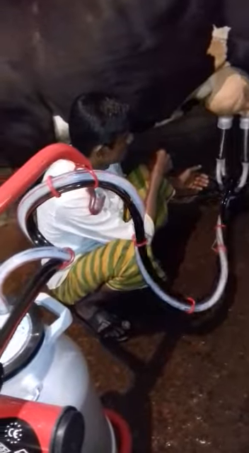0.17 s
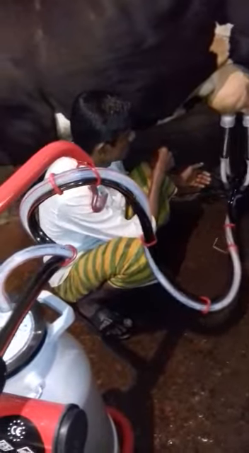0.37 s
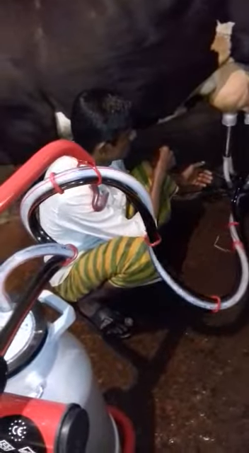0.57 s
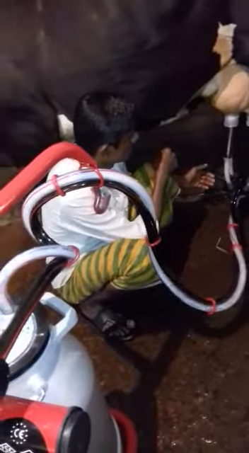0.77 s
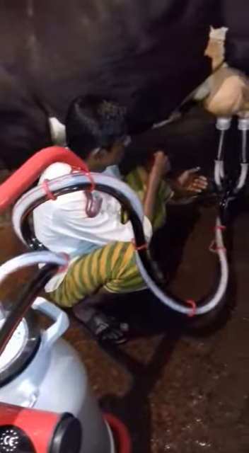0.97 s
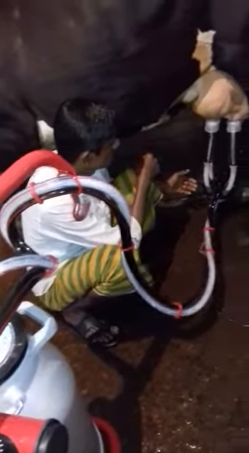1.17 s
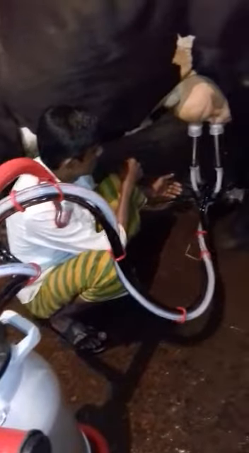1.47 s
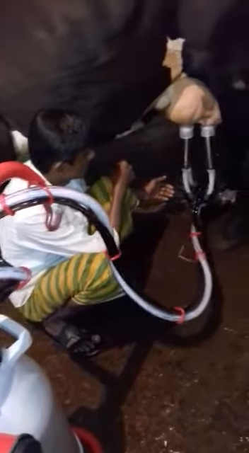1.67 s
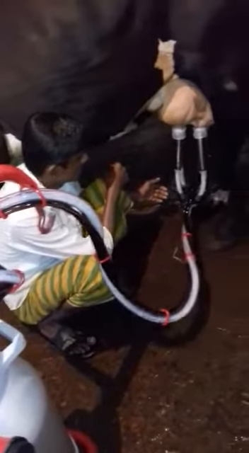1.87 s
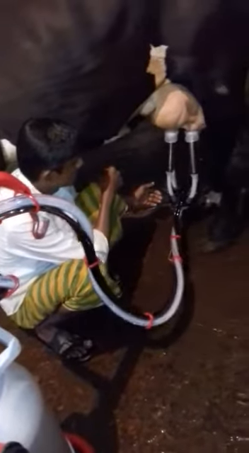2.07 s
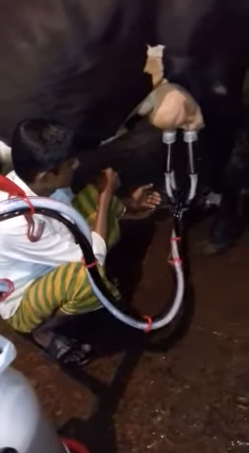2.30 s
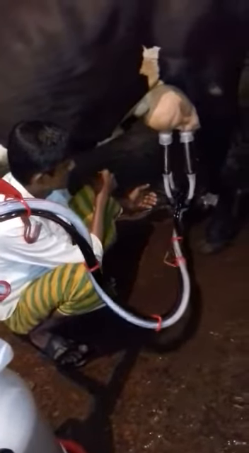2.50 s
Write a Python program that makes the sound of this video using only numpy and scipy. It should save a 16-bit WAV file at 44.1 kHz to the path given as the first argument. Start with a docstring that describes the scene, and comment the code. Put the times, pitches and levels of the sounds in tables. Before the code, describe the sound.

A portable milking machine runs steadily up close, its vacuum pump hissing and chugging rapidly.

```python
"""A portable milking machine runs steadily beside a cow, close to the microphone.
Its motor-driven vacuum pump chugs twice a turn: even harmonics of the shaft rate, with casing and frame tones.
Coloured noise makes the rough churning and the loud air hiss, which dips and puffs at each chug.
A knock once a turn rings small metal parts; the pulsator clacks over and back about once a second.
Something shuffles softly near the middle, as a short swell of dull noise."""
import sys
import numpy as np
from scipy import signal
from scipy.fft import rfft, irfft
from scipy.io import wavfile

SR = 44100
rng = np.random.default_rng(int(sys.argv[2]) if len(sys.argv) > 2 else 0)


def to_wav(sig):
    """Store sig (one row per channel, or 1-D mono) as 16-bit WAV at the path in sys.argv[1].

    Samples outside -1..1 are clipped; the rate is SR.
    """
    pcm = np.clip(np.atleast_2d(sig), -1, 1) * 32767
    pcm = np.round(pcm).astype(np.int16)
    wavfile.write(sys.argv[1], SR, pcm.T)  # frames by channels


N = 116424  # samples

SHAFT_HZ, SPEED_WANDER = 48.255, 0.00048  # mean shaft rate; spread as a share of it

# Pump hum, before the body level: multiple_of_shaft_rate, level_db
HUM_HARMONICS = [(2, -56.5), (4, -44), (6, -53), (8, -41), (10, -40.5), (12, -43.5), (14, -52)]
CHUG_TURN, HUM_WAVER_DB = 0.2767, 0.68  # place of the crest in turns; level spread
CHUG_SMEAR = 0.0035  # turns of delay per multiple: each chug sweeps upward

# Casing shaken once a turn, before the body level: multiple_of_shaft_rate, level_db
CASING_HARMONICS = [(20, -52), (21, -54.5), (22, -51.5), (23, -63), (24, -44), (25, -45), (26, -47.5),
                    (27, -57.5), (32, -50.5), (34, -58), (44, -47)]
CASING_WAVER_DB = 1.1
# Steady tones of motor and frame, before the body level: pitch_hz, level_db
FRAME_TONES = [(85, -63), (204, -54), (264, -58), (748, -62)]

# Colour of the running machine's churning: freq_hz, relative_db_per_hz
CHURN_COLOUR = [(25, -33), (60, -29), (130, -22), (260, -13.5), (550, -11), (720, -10), (930, -6),
                (1270, -3), (1400, -11), (1580, -6.5), (1950, -6), (2650, 2), (3020, -4), (3400, 1.5),
                (3900, -5), (6000, -15)]
CHURN_DB, CHURN_FLUTTER_DB = -27, 0.5  # level before the body level; level spread

# Level of hum, casing, frame and churn as the microphone moves: time_s, gain_db
BODY_LEVEL_CURVE = [(0, -0.4), (.9, -0.5), (1.65, 0), (2.2, -0.3), (2.64, -1.2)]

# Colour of the rushing air: freq_hz, relative_db_per_hz
HISS_COLOUR = [(200, -49), (2000, -30), (4000, -16), (4700, -8), (5700, -11), (6000, -6.5), (6350, -6.5),
               (6900, -1.5), (7750, 0.9), (8350, 2.5), (9050, -0.9), (9600, -4.5), (10000, -5),
               (11200, -10), (11600, -8.3), (13200, -14), (15600, -13)]
# Faint whistles of the air outlet: pitch_hz, width_hz, boost_db
OUTLET_WHISTLES = [(6930, 160, 3.5), (7870, 100, 3.5), (8700, 190, 2), (10500, 150, 6), (11600, 140, 1.5)]
# Level of the hiss over time, added to HISS_DB: time_s, gain_db
HISS_LEVEL_CURVE = [(0, -.2), (.7, -0.55), (1.4, -0.5), (2.2, 0), (2.64, 0.2)]
HISS_DB = -13
HISS_FLUTTER_DB, FLUTTER_HZ, HISS_GRAIN_DB = 0.43, 26, 0.58  # slow flutter and its rate; fast grain
VALVE_TURN, VALVE_DIP, VALVE_PUFF = 0.277, 0.31, 0.16  # place in turns; shares of the flow
VALVE_WIDTH, PUFF_LAG = 0.091, 0.13  # chugs

# What the knock rings: pitch_hz, t60_s, relative_level_db
KNOCK_MODES_TABLE = [(2730, .006, -6), (3317, 0.033, -2), (3476, 0.021, -3), (3440, .008, -32),
                     (4600, .005, 3)]
KNOCK_TURN, TURN_JITTER_S = .47, .00002  # place in turns; timing scatter
KNOCK_DB, KNOCK_SPREAD = -32, 0.33  # level of the whole train; scatter of each blow's strength
KNOCK_GRIT, KNOCK_GRIT_S = 0.091, 0.00087  # noise share of a blow; its decay time
KNOCK_LOW_HZ = 2300  # the small parts radiate little below this

# Pulsator clacks: start_s, level_db
PULSATOR_CLACKS = [(.491, -17.5), (1.035, -15), (1.551, -15.5), (2.098, -14.5), (2.613, -17)]
# Colour of the clacks: freq_hz, relative_db_per_hz
CLACK_COLOUR_CURVE = [(400, -35), (1100, -15), (2100, -17), (2600, 2.5), (3400, -9.5), (4400, 2.5),
                      (5400, -24), (10000, -37)]
CLACK_DECAY_S, REBOUND_S, REBOUND_DB = .003, .0055, -2  # rebound: delay and relative level

# Colour of the soft shuffle: freq_hz, relative_db_per_hz
SHUFFLE_COLOUR = [(120, -28), (220, -4), (310, 6), (400, 2.5), (600, -13), (1500, -38)]
SHUFFLE_S, SHUFFLE_WIDTH_S, SHUFFLE_DB = 1.16, 0.052, -37.5  # centre, swell width, peak level

CEILING, TOP_HZ = .88, 15720  # full-scale limit; upper edge of the sound
NOTCH_HZ, NOTCH_WIDTH_HZ, NOTCH_DEPTH, NOTCH_REACH_HZ = 8060, 1100, .62, 1900  # depth: share removed


def undb(db):
    """Decibels to gain."""
    return 10 ** (np.asarray(db) / 20)


def unit(x):
    """Scale to rms 1."""
    return x / np.sqrt(np.mean(x ** 2))


def bin_hz():
    """Frequency of each spectrum bin."""
    return np.arange(N // 2 + 1) * SR / N


def curve(points, t):
    """Gain drawn in straight dB lines between (time_s, gain_db) points."""
    return undb(np.interp(t, *np.array(points).T))


def colour(x, points):
    """Filter by (freq_hz, db) points, joined over log frequency."""
    hz, db = np.array(points, float).T
    f = np.maximum(bin_hz(), 1)
    gain = undb(np.interp(np.log(f), np.log(hz), db))
    return irfft(rfft(x) * gain, N)


def noise(points):
    """Noise of a given colour, rms 1."""
    return unit(colour(rng.standard_normal(N), points))


def walk(rate):
    """Random wavering with spread 1, mostly slower than rate in Hz."""
    f = bin_hz()
    lowpass = np.exp(-2 * (f / rate) ** 2) * (f > 0)
    return unit(irfft(rfft(rng.standard_normal(N)) * lowpass, N))


def tone(cycles, db):
    """A sine at an rms level."""
    return np.sqrt(2) * undb(db) * np.cos(2 * np.pi * cycles)


def pump_hum(turns):
    """Two chugs a turn: even harmonics that crest nearly together, the higher ones a little later."""
    hum = np.zeros(N)
    for multiple, db in HUM_HARMONICS:
        k = round(multiple)
        hum += tone(k * (turns - CHUG_TURN - CHUG_SMEAR * k), db + HUM_WAVER_DB * walk(5.9))
    return hum


def casing_and_frame(turns, t):
    """The casing buzzes at multiples of the shaft rate; motor and frame hold fixed pitches."""
    buzz = np.zeros(N)
    for multiple, db in CASING_HARMONICS:
        buzz += tone(round(multiple) * turns + rng.random(), db + CASING_WAVER_DB * walk(39))
    for hz, db in FRAME_TONES:
        buzz += tone(hz * t + rng.random(), db + walk(10))
    return buzz


def churn():
    """Rough running of motor and pump: coloured noise with a fluttering level."""
    return noise(CHURN_COLOUR) * undb(CHURN_DB + CHURN_FLUTTER_DB * walk(46))


def air_hiss(turns, t):
    """Turbulent hiss with faint whistles; it is pinched off a little, then puffs, at each chug."""
    chugs = 2 * (turns - VALVE_TURN)

    def bump(lag):
        """A smooth pulse once a chug."""
        offset = (chugs - lag + .5) % 1 - .5
        return np.exp(-(offset / VALVE_WIDTH) ** 2)

    flow = 1 - VALVE_DIP * bump(0) + VALVE_PUFF * bump(PUFF_LAG)
    flutter = undb(HISS_FLUTTER_DB * walk(FLUTTER_HZ) + HISS_GRAIN_DB * walk(620))
    f = bin_hz()
    boost_db = sum(db / (1 + (2 * (f - hz) / width) ** 2) for hz, width, db in OUTLET_WHISTLES)
    jet = irfft(rfft(noise(HISS_COLOUR)) * undb(boost_db), N)
    return undb(HISS_DB) * curve(HISS_LEVEL_CURVE, t) * unit(jet * flow * flutter)


def knock(turns, t):
    """One gritty blow a turn, of varying strength, excites decaying metal modes."""
    each = np.arange(int(turns[-1])) + KNOCK_TURN
    shift, strength = rng.uniform(-1.2, 1, (len(each), 2)).T
    at = (np.interp(each, turns, t) + TURN_JITTER_S * shift) * SR
    blows = np.zeros(N)
    blows[np.clip(at.astype(int), 0, N - 1)] = 1 + KNOCK_SPREAD * strength
    grit_envelope = signal.fftconvolve(blows, np.exp(-t / KNOCK_GRIT_S))[:N]
    grit = KNOCK_GRIT * rng.standard_normal(N) * grit_envelope
    ring = np.zeros(N)
    for hz, t60, db in KNOCK_MODES_TABLE:
        decay = np.exp(-np.log(1000) * t / t60)
        ring += undb(db) * decay * np.cos(2 * np.pi * hz * t)
    rung = signal.fftconvolve(blows + grit, ring)[:N]
    highpass = signal.butter(2, KNOCK_LOW_HZ, "high", fs=SR, output="sos")
    return undb(KNOCK_DB) * unit(signal.sosfilt(highpass, rung))


def pulsator(t):
    """The slide hits its stop and rebounds once: two decaying bursts of coloured noise a clack."""
    def hit(start):
        """Sudden onset, exponential decay."""
        return (t >= start) * np.exp(-np.abs(t - start) / CLACK_DECAY_S)

    blows = np.zeros(N)
    for start, db in PULSATOR_CLACKS:
        blows += undb(db) * (hit(start) + undb(REBOUND_DB) * hit(start + REBOUND_S))
    rub = rng.standard_normal(N)
    loudness = np.std(colour(rub, CLACK_COLOUR_CURVE))  # of the steady noise, so colour adds no level
    return colour(rub * blows, CLACK_COLOUR_CURVE) / loudness


def shuffle(t):
    """A brief dull shuffle: noise that swells and fades smoothly."""
    swell = np.exp(-((t - SHUFFLE_S) / SHUFFLE_WIDTH_S) ** 2)
    return noise(SHUFFLE_COLOUR) * undb(SHUFFLE_DB) * swell


def notched(x):
    """A resonant notch in the treble, confined to its neighbourhood."""
    f = bin_hz()
    band = 1j * f * NOTCH_WIDTH_HZ / (NOTCH_HZ ** 2 - f ** 2 + 1j * f * NOTCH_WIDTH_HZ)
    near = np.exp(-((f - NOTCH_HZ) / NOTCH_REACH_HZ) ** 6)
    return irfft(rfft(x) * (1 - NOTCH_DEPTH * band * near), N)


def scene():
    """One shaft drives hum, casing buzz, knock and hiss pulses; both channels hear the same."""
    t = np.arange(N) / SR
    turns = np.cumsum(SHAFT_HZ * (1 + SPEED_WANDER * walk(3.2))) / SR
    machine = pump_hum(turns) + casing_and_frame(turns, t) + churn()
    machine = machine * curve(BODY_LEVEL_CURVE, t)
    sound = machine + air_hiss(turns, t) + knock(turns, t) + pulsator(t) + shuffle(t)
    return np.array([sound, sound])


def record(dry):
    """The recorder rounds only the very highest peaks, notches the left channel and cuts the top steeply."""
    left, right = dry / (1 + (dry / CEILING) ** 16) ** (1 / 16)
    lowpass = signal.ellip(12, .1, 90, TOP_HZ, fs=SR, output="sos")
    return signal.sosfilt(lowpass, np.array([notched(left), right]))


dry = scene()
out = record(dry)
to_wav(out)
```